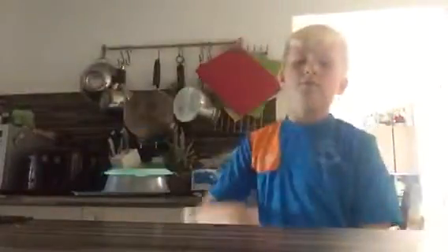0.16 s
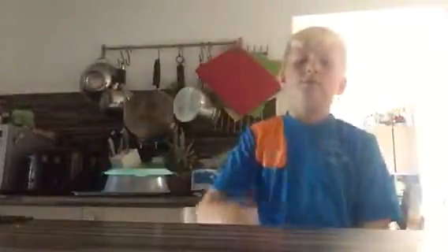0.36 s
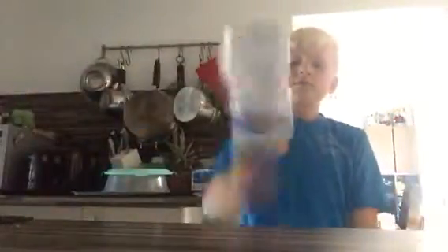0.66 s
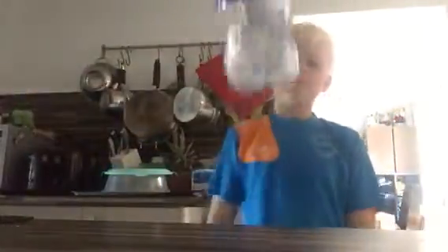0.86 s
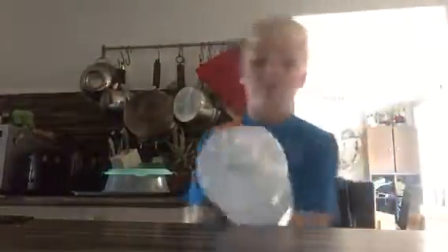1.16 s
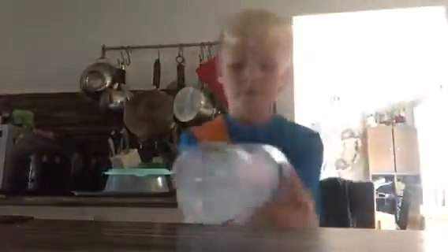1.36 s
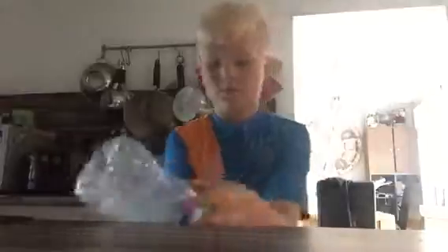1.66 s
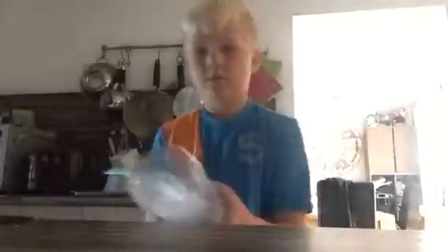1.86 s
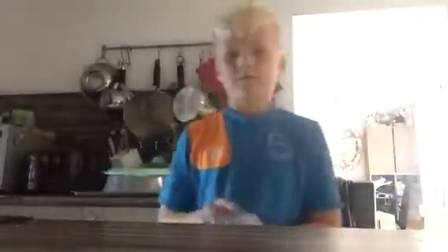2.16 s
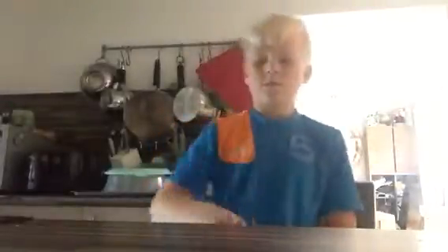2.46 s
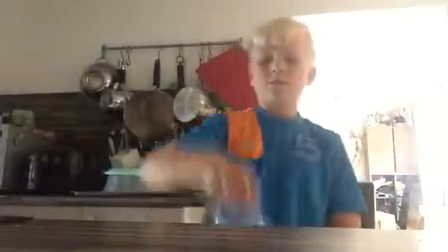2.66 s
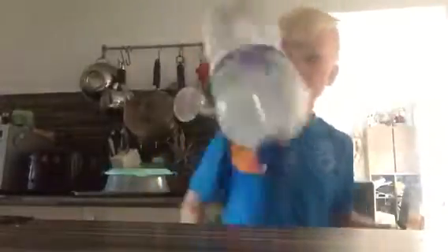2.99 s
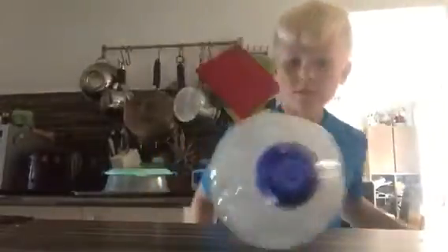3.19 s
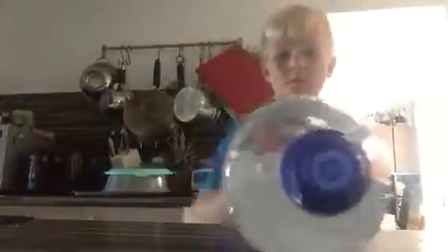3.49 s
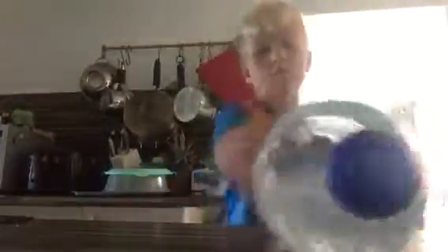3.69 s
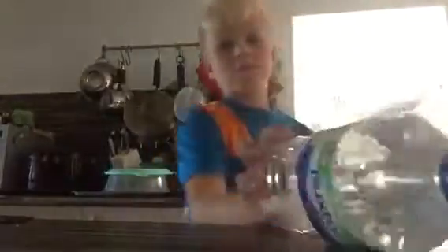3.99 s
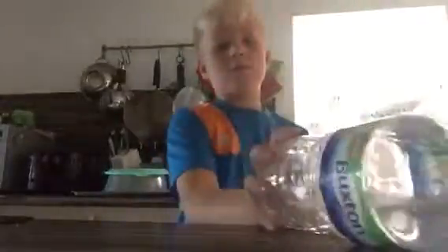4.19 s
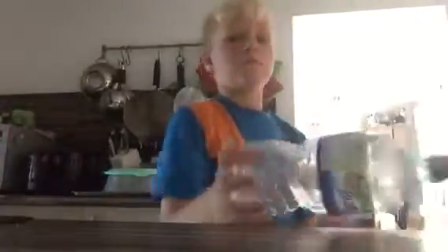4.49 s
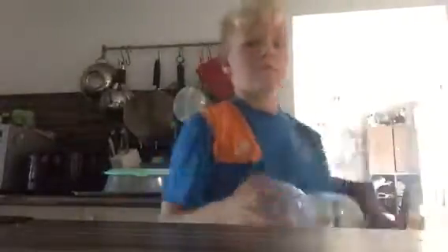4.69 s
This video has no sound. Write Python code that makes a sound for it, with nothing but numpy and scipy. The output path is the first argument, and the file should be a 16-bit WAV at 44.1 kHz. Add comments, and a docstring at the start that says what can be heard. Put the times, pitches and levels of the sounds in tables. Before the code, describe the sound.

A part-filled plastic bottle slams onto a kitchen counter twice, with hollow knocks, sloshing water, rolling bumps and crackling plastic between quiet gaps.

```python
"""Kitchen counter: a part-filled plastic bottle is flung onto it twice, beside a small microphone.
Knocks ring the thin wall by a ragged contact force; snapping dents tick as short coloured bursts.
The water sloshes as grains of rising bubble tones and fizzes as spray noise over a wandering rumble.
Low sagging tones and counter modes are the thumps; the bottle echoes in a quiet kitchen."""
import sys
import numpy as np
from scipy import signal
from scipy.fft import rfft, irfft, next_fast_len
from scipy.io import wavfile
from scipy.ndimage import uniform_filter1d

SR = 44100
rng = np.random.default_rng(int(sys.argv[2]) if len(sys.argv) > 2 else 0)


def master(y):
    """Save y as 16-bit WAV."""
    cut = np.clip(np.atleast_2d(y).T, -1, 1)
    pcm = np.round(cut * 32767)  # scale
    wavfile.write(sys.argv[1], SR, pcm.astype(np.int16))


def gain_from_db(level_db):
    """Turn a decibel level (scalar or array-like) into a linear amplitude factor."""
    decades = np.asarray(level_db, float) / 20
    return 10 ** decades


N = 213311  # samples

# Colour of fine spray and of the wall's crack: pitch_hz, relative density_db (per Hz)
FIZZ_COLOUR = [(2350, -52.5), (4000, 2.5), (4870, -6), (6110, -1.5), (10400, -9), (11800, -6.5),
               (14800, -8.5), (16000, -18.5)]


def evened(x):
    """Scales to rms 1."""
    return x / np.sqrt(np.mean(x ** 2) + 1e-20)


def read(points, hz):
    """Reads a curve on a log-frequency axis."""
    f, value = np.transpose(points)
    return np.interp(np.log(hz + 1), np.log(f + 1), value)


def add(mix, start_s, sound):
    """Mixes a sound in at its start."""
    part = mix[round(start_s * SR):][:len(sound)]
    part += sound[:len(part)]


def coloured(x, points):
    """Weights the spectrum of x by a curve in dB, then scales to rms 1."""
    size = next_fast_len(len(x))
    gain = gain_from_db(read(points, np.fft.rfftfreq(size, 1 / SR)))
    return evened(irfft(rfft(x, size) * gain, size)[:len(x)])


def ring(modes, t, shift_db=0, phase=0):
    """Dying sines of a struck body; phase is in cycles."""
    hz, db, t60 = np.transpose(modes)[:, :, None]
    level = gain_from_db(db + shift_db - 60 * t / t60)
    return (level * np.sin(2 * np.pi * (hz * t + phase))).sum(0)


def quiet_kitchen():
    """Steady noise of the quiet kitchen, strongest in the low end."""
    # pitch_hz, relative density_db (per Hz)
    hush_colour = [(18, -61), (30, -29), (103, 1.5), (124, -22.5), (141, -7), (239, -8.5), (449, -24),
                   (486, -17), (866, -14.5), (937, -17), (1810, -23.5), (1960, -26), (5310, -31.5),
                   (12600, -33.5), (16000, -36)]
    return gain_from_db(-68.5) * coloured(rng.standard_normal(N), hush_colour)


def fading_tones():
    """Thin tones dying away exponentially from the start."""
    # pitch_hz, level_db at the start, t60_s
    thin_tones = [(2495, -67, 0.29), (3500, -72.5, 0.46), (400, -66, 0.25)]
    return ring(thin_tones, np.arange(N) / SR)


def kitchen_echo(x):
    """Sparse echoes of random sign, each band dying at its own speed; three tails take turns."""
    # pitch_hz, t60_s
    room_decay = [(100, 0.44), (400, .25), (1200, 0.17), (3000, 0.17), (8000, 0.15), (15000, 0.078)]
    taps = np.zeros((3, SR // 2))
    at = np.arange(200, SR // 2 - 20, 20)
    places = at + rng.integers(0, 20, (3, len(at)))
    np.put_along_axis(taps, places, rng.choice([-1., 1.], (3, len(at))), 1)
    hz, t, z = signal.stft(taps, SR, nperseg=256)
    t60 = np.maximum(read(room_decay, hz), .03)[:, None]
    tail = signal.istft(z * gain_from_db(-60 * t / t60), SR, nperseg=256)[1]
    tail = tail / np.linalg.norm(tail) * np.sqrt(2)
    # Each tail is fed through a 25 Hz cosine, a third of a cycle apart
    turn = 2 * np.pi * (np.arange(N) / SR * 25 + np.arange(3)[:, None] / 3)
    return signal.fftconvolve(x * np.cos(turn), tail, axes=1)[:, :N].sum(0)


def surge_levels():
    """Slosh and fizz levels in dB: each surge climbs to its top and falls away; their powers add."""
    # The water surges as the bottle is swung, lands or rolls: top_s, slosh_db, fizz_db,
    # rise_s and fall_s (time over which the slosh changes by 20 dB; signs are ignored)
    surges = [(0.005, -65.5, -74, -10, 0.27), (0.62, -71, -95, 0.6, 3), (0.785, -47, -60, 0.03, 0.01),
              (0.878, -42, -44.5, 0.0821, 0.14), (0.99, -62, -77, 0.16, .055),
              (1.112, -26.5, -40.5, 0.001, 0.066), (1.22, -32.5, -52, 0.0212, 0.1065),
              (1.349, -36, -55, .045, 0.0866), (1.412, -41, -55.5, 0.0927, 0.0574),
              (1.515, -77, -67, 0.4, 0.175), (1.6, -41, -55.5, 0.14, 0.1251), (1.68, -39, -54, 0.13, 0.14),
              (1.765, -49, -69, 0.16, 0.03), (1.9, -58.5, -74, 0, .08), (2.045, -63, -69.5, 0.14, 0.03),
              (2.2, -68, -76.5, 0.2, 0.1), (2.332, -51, -59.5, 0.05, 0.08), (2.44, -59.5, -68, 0.36, 0.24),
              (2.69, -65.5, -84, -0.13, 0.3), (2.888, -57, -68.5, -0.01, -0.46),
              (3.027, -34, -42.5, 0.0445, 0.1172), (3.108, -45, -51.5, 0.0749, 0.14),
              (3.259, -33, -42, 0.02, 0.1449), (3.42, -54, -65, 0.13, 0.4), (3.539, -56.5, -63, 0.1, -0.26),
              (3.825, -42, -47, .03, 0.1), (3.765, -52, -76, 0.07, 0.14), (3.94, -48, -58.5, 0.14, 0.09),
              (4.012, -40.5, -49, 0.09, 0.146), (4.088, -48.5, -57.5, 0.19, 0.02),
              (4.221, -51, -68.5, .15, 0.4), (4.418, -52.5, -57, .09, 0.22),
              (4.509, -60.5, -71, 0.37, 0.26), (4.797, -50.5, -58, 0.0348, 2.5),
              (4.83, -41, -40.5, 0.03, -2)]
    rise_bend, fall_bend = 1.77, 1.15  # sets in abruptly, rounds over its top and drops ever faster
    top_s, slosh_db, fizz_db, rise_s, fall_s = np.transpose(surges)[:, :, None]
    at = np.arange(0, N + 64, 64)
    t = at / SR - top_s
    bend = np.where(t < 0, abs(t / rise_s) ** rise_bend, abs(t / fall_s) ** fall_bend)
    levels = []
    for tops_db, steeper in ((slosh_db, 1), (fizz_db, 1.35)):  # the fizz changes more steeply
        power = (gain_from_db(tops_db - 20 * steeper * bend) ** 2).sum(0)
        levels.append(np.interp(np.arange(N), at, 10 * np.log10(power + 1e-14)))
    return levels


def rumble(slosh_db):
    """Rumble in the counter: narrow noise whose centre wanders, its level following the slosh."""
    level_db = -48.5 + 1.25 * (slosh_db + 45)
    centre_hz, wander, width_hz = 190, .15, 120  # wander: rms share of the centre
    drift = evened(uniform_filter1d(rng.standard_normal(N), size=2000))
    hz = centre_hz * (1 + wander * drift)
    r = np.exp(-np.pi * width_hz / SR)
    noise = rng.standard_normal(N) + 1j * rng.standard_normal(N)
    narrow = signal.lfilter([1], np.convolve([1, -r], [1, -r]), noise)
    shifted = narrow * np.exp(2j * np.pi * np.cumsum(hz) / SR)  # moved up to the centre
    return gain_from_db(level_db) * evened(shifted.real)


def fizz(grains):
    """Fine spray: noise swelling with each grain, over a steady share; rms 1."""
    bursts = signal.lfilter([1], [1, -.97], grains)  # each grain sprays for about a millisecond
    return coloured((evened(bursts) + .8) * rng.standard_normal(N), FIZZ_COLOUR)


def slosh(grains):
    """Splashes: every grain rings a bubble whose pitch rises as it surfaces, over noise; rms 1."""
    # pitch_hz, relative density_db (per Hz)
    slosh_colour = [(210, -27.5), (350, -16), (409, -1), (675, -0.5), (1320, -3), (1440, -13), (1900, -4.5),
                    (3960, -13.5), (5000, -48.5), (6500, -28), (11000, -120)]
    t = np.arange(1500) / SR
    kind, splash = rng.integers(0, 24, N), np.zeros(N)
    for k, hz in enumerate(np.geomspace(400, 4600, 24)):
        bubble = np.sin(2 * np.pi * hz * t * (1 + 13.0 * t)) * np.exp(-t * hz / 6.5)
        weight = gain_from_db(read(slosh_colour, hz)) * hz
        splash += signal.oaconvolve(grains * (kind == k), weight * bubble)[:N]
    return evened(evened(splash) + 0.49 * coloured(rng.standard_normal(N), slosh_colour))


def water():
    """Water on the move: slosh and fizz share dense uneven grains; the counter rumbles along."""
    slosh_db, fizz_db = surge_levels()
    strength = gain_from_db(3.8 * np.minimum(rng.exponential(1, N), 4))
    grains = (rng.random(N) < 3600 / SR) * strength  # 3600 a second on average
    return gain_from_db(slosh_db) * slosh(grains) + gain_from_db(fizz_db) * fizz(grains) + rumble(slosh_db)


def thump(db, hz, flex_db):
    """A low tone sags in pitch as the load settles, with nearby counter modes and the slab's flex."""
    # Counter top: pitch_hz, relative level_db, t60_s
    counter_modes = [(106, 0, 0.12), (174, 2.5, 0.32), (230, 10.5, 0.065), (309, 0, 0.17)]
    t = np.arange(SR // 3) / SR
    # A harder thump presses the bottle down and dies sooner: t60 0.1 s at -30 dB, half 27 dB above
    t60 = .1 * 2 ** (-(db + 30) / 27)
    turns = np.cumsum(hz * 2 ** (0.1 * np.exp(-t / 0.0081))) / SR
    tone = np.sin(2 * np.pi * turns) * gain_from_db(-60 * t / t60)
    near_db = -10 - 8.5 * abs(np.log2(np.transpose(counter_modes)[0][:, None] / hz))
    modes = ring(counter_modes, t, near_db, phase=rng.random((len(counter_modes), 1)))
    held_down = .35  # share of the thump's damping that also stills the counter
    sound = tone + gain_from_db(-60 * held_down * t / t60) * modes
    sound = sound * (1 - np.exp(-t / 0.0033))
    # The whole slab bends at 55 Hz, t60 0.22 s
    flex = ring([(55, flex_db, 0.22)], t) * (1 - np.exp(-t / .008))
    return gain_from_db(db) * sound / abs(sound).max() + flex


def snap(db, hz, octaves):
    """A dent snaps with a dry tick: a short burst strongest around the pitch of the dent."""
    t = np.arange(2048) / SR
    wide = 2 ** max(octaves, .1)
    colour = [(hz / wide ** 4, -45), (hz / wide, -10), (hz, 0), (hz * wide, -10), (hz * wide ** 4, -40)]
    envelope = gain_from_db(-60 * t / .021) * (1 - np.exp(-t / 0.00015))  # t60 21 ms
    tick = coloured(rng.standard_normal(2048), colour) * envelope
    return gain_from_db(db) * tick / abs(tick).max()


def knock(wall_db, crack_db, bright_hz, contact_ms):
    """A ragged contact force rings the wall resonances near the spot hit, with a crack on top."""
    # Broad resonances of the bottle wall: pitch_hz, relative level_db
    wall_modes = [(470, -26), (590, -12.5), (680, -23), (790, -1), (950, 1), (1150, 1.5), (1460, -9),
                  (1780, 7.5), (2000, -17), (2300, -4), (2690, 9.5), (3250, 8.5), (4200, -4)]
    t = np.arange(4096) / SR
    build_up_ms = 1  # how fast the contact force rises
    shape = np.exp(-1000 * t / max(contact_ms, .3)) * (1 - np.exp(-1000 * t / max(build_up_ms, .05)))
    # The base crumples in many small steps
    force = rng.standard_normal(4096) * gain_from_db(4.3 * rng.standard_normal(4096))
    hz, db = np.transpose(wall_modes)
    # Dents and water level retune the wall each time
    hz = hz * (1 + 0.045 * rng.standard_normal(len(hz)))
    db = db - 8. * abs(np.log2(hz / bright_hz)) + 2 * rng.standard_normal(len(hz))
    t60 = 25 / hz  # the water damps each resonance by 60 dB in 25 cycles
    wall = signal.fftconvolve(force * shape, ring(np.c_[hz, db, t60], t))[:len(t)]
    crack = coloured(force, FIZZ_COLOUR) * shape ** 2.0
    return gain_from_db(wall_db) * wall / abs(wall).max() + gain_from_db(crack_db + 8.0) * crack / abs(crack).max()


def scene():
    """The bottle echoes in the kitchen; the thumps reach the microphone through the counter."""
    # The weight of the water thumps the counter: start_s, peak_db, settled pitch_hz, flex_db
    thumps = [(0.007, -46.5, 152.4, -68), (0.778, -30.5, 163, -68), (0.81, -32.5, 161, -69),
              (0.841, -27.5, 121, -65), (0.912, -33, 119, -72.5), (1.014, -45, 126, -58.5),
              (1.05, -48, 125, -61), (1.097, -13.5, 248, -34.5), (1.104, -9, 174.6, -32),
              (1.127, -23.5, 246, -43), (1.194, -27, 184, -59.5), (1.239, -27, 268, -66),
              (1.328, -35, 261, -36), (1.373, -19.5, 199, -41.5), (1.43, -26, 174, -44),
              (1.497, -36.5, 263, -62.5), (1.529, -38.5, 213, -60), (1.663, -32, 174, -50),
              (1.731, -30.5, 166.5, -46), (2.133, -54, 213, -82), (2.323, -50.5, 190, -74),
              (2.934, -50, 202, -71), (3.005, -30.5, 115.4, -56), (3.034, -28, 199, -56.5),
              (3.073, -36, 190, -60.5), (3.22, -23.5, 236, -34), (3.241, -21, 229, -26.5),
              (3.298, -30, 165, -53.5), (3.81, -36, 200, -48), (3.84, -31.5, 196, -34),
              (3.871, -28, 166.3, -60), (3.989, -39, 350, -70), (4.02, -29, 223, -70),
              (4.025, -29, 396, -78), (3.85, -35.5, 338, -70), (4.11, -39.5, 202, -61.5),
              (4.41, -46.5, 245, -80.5), (4.495, -49, 253, -80), (4.601, -53, 199, -58),
              (3.625, -50.5, 190, -61), (4.785, -39, 184, -63.5)]
    # Dents in the wall snap: start_s, peak_db, pitch_hz, spread_octaves
    snaps = [(1.0792, -47, 898, 0.67), (1.7211, -38.5, 7450, 0.84), (1.7381, -31, 2770, 0.92),
             (1.7817, -36, 3820, 0.35), (1.7971, -35, 2510, 0.52), (1.8587, -55, 2090, 0.16),
             (1.8722, -46, 1125, 1.2), (1.893, -45.5, 1500, 0.13), (1.905, -49.5, 1510, .12),
             (1.9181, -45, 3380, 0.48), (1.9567, -42.5, 13150, 1.05), (2.0016, -50.5, 14600, 0.91),
             (2.0382, -41.5, 13740, 1.5), (2.036, -46.5, 2600, 0.48), (1.973, -51, 3400, 0.27),
             (2.07, -47.5, 6130, 0.17), (2.139, -55.5, 5300, 0.84), (2.2356, -41.5, 12000, 1.03),
             (2.4448, -47, 3180, 0.17), (2.9252, -48, 8100, 0.21), (3.2014, -51, 8940, 0.25),
             (3.2092, -41.5, 2990, .3), (3.3944, -49, 5500, 0.24), (3.436, -48, 5650, 0.98),
             (3.7441, -29, 1850, 0.67), (3.767, -28, 1820, 1.2), (3.9565, -37, 1100, 0.88),
             (4.1414, -48.5, 2600, 0.23), (4.175, -32.5, 1970, 0.33), (4.177, -38, 700, 0.49),
             (4.205, -33, 980, 0.19), (4.2077, -31, 2510, 0.6), (4.252, -34, 2700, 0.91),
             (4.264, -41, 3500, 0.75), (4.285, -42.5, 9000, 0.34), (4.2965, -30, 1670, 0.39),
             (4.3239, -38, 2920, 0.36), (4.4838, -33, 3470, 0.24), (4.4992, -38.5, 2120, 0.27),
             (4.787, -39, 2030, .9)]
    # Bottle meets counter or hand: start_s, wall peak_db, crack peak_db less 8 dB,
    # brightest wall_hz, contact_ms (time constant of the dying force)
    knocks = [(0.768, -29, -82, 3540, 7.1), (0.778, -25.5, -41.5, 770, 1.6), (1.097, -14, -34.5, 1058, 4.7),
              (1.1, 0.5, -17, 780, 1.7), (1.106, -6, -31, 620, 3.3), (1.189, -35, -30, 1620, 3.3),
              (1.196, -8, -32, 1290, 2.6), (1.229, -19.5, -42, 1037, 3.0), (1.241, -20, -38.5, 864, 4),
              (1.326, -21, -39.5, 719, 6.6), (1.343, -23.5, -41, 2700, 3), (1.367, -24.5, -42.5, 970, 3.0),
              (1.501, -36, -47, 544, 6.8), (1.635, -23.5, -44.5, 1020, 4.8),
              (1.648, -19.5, -30.5, 563, 3.6), (1.663, -23.5, -41.5, 683, 9), (1.731, -27, -50, 1620, 1.2),
              (2.317, -40, -54, 678, 5.1), (2.425, -50, -68, 780, 9), (2.518, -53, -75, 800, 6),
              (2.667, -46.5, -63, 722, 7.9), (2.688, -50, -70, 762, 6), (2.978, -37, -54, 940, 4.5),
              (3.0, -29.5, -40, 1315, 6.3), (3.009, -17.5, -38, 706, 7.4), (3.022, -18.5, -43, 730, 1.8),
              (3.22, 0, -7.5, 910, 1.36), (3.224, -4.5, -34, 1800, 2.1), (3.232, -2, -21.5, 1100, 3.5),
              (3.238, 2, -28.5, 1100, 1.8), (3.252, -9, -36, 934, 3.0), (3.275, -28, -38.5, 509, 2.4),
              (3.8, -35.5, -44.5, 665, 2.5), (3.812, -26.5, -35.5, 1210, 4.8),
              (3.819, -25, -40.5, 1060, 4.9), (3.833, -25.5, -40, 930, 6.2), (3.866, -25, -43, 680, 3.5),
              (3.916, -29.5, -43.5, 713, 3), (3.988, -22.5, -43, 1110, 3.1), (4.021, -22, -32.5, 600, 3.2),
              (4.817, -25, -42, 1560, 1.96)]
    bottle, counter = np.zeros((2, N))
    for mix, table, source in ((counter, thumps, thump), (bottle, snaps, snap), (bottle, knocks, knock)):
        for start_s, *row in table:
            add(mix, start_s, source(*row))
    background = quiet_kitchen() + fading_tones()
    echo = gain_from_db(-11.0) * kitchen_echo(bottle)
    return (background + echo + water() + counter + bottle)[None]


def roll_off(x):
    """The treble ends steeply here."""
    return signal.sosfilt(signal.butter(12, 17080, fs=SR, output="sos"), x)


def record(dry):
    """The small microphone rounds off the loudest peaks and drops the deep bass.

    A steep low-pass then ends the treble at 16.7 kHz."""
    rounded = 0.75 * np.tanh(dry / 0.71)
    thin = signal.sosfilt(signal.butter(2, 45., "high", fs=SR, output="sos"), rounded)
    low_pass = signal.firwin(255, 16700, window=("kaiser", 8), fs=SR)
    finished = signal.oaconvolve(thin, low_pass[None], "same")
    return roll_off(finished)


dry = scene()
out = record(dry)
master(out)
```